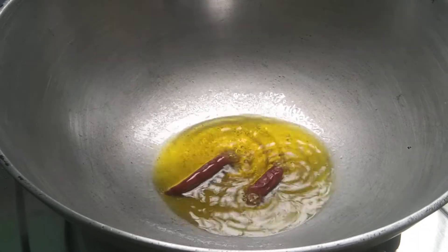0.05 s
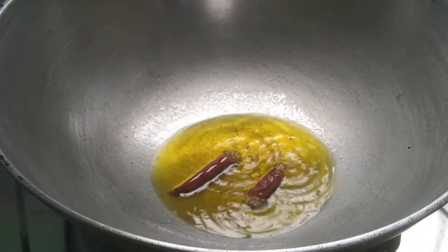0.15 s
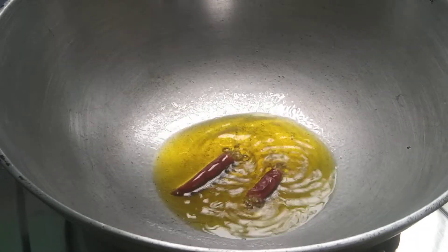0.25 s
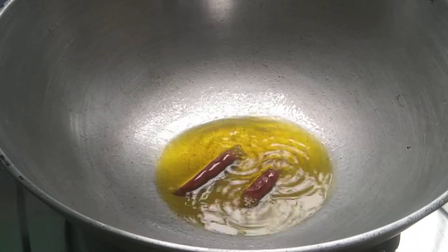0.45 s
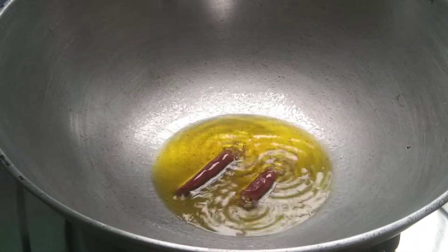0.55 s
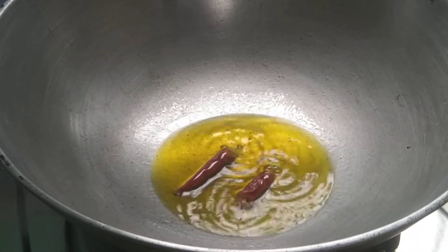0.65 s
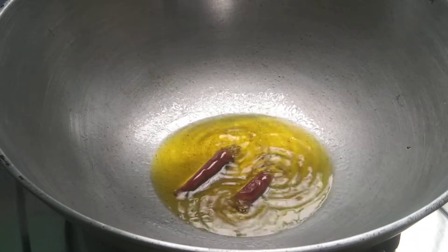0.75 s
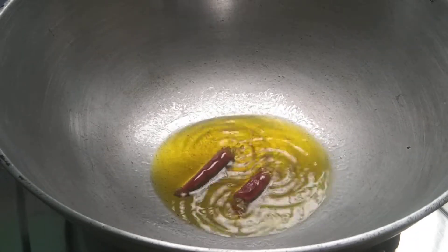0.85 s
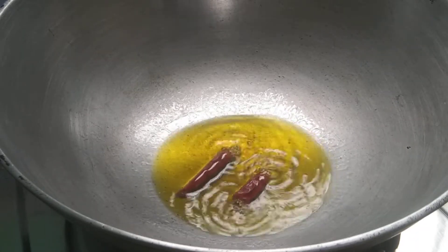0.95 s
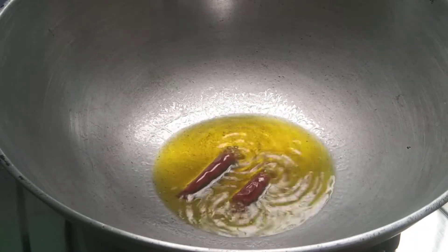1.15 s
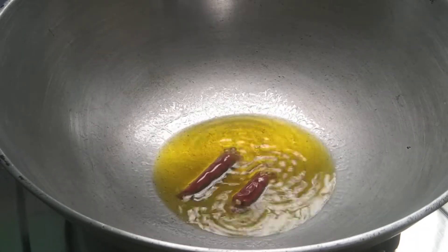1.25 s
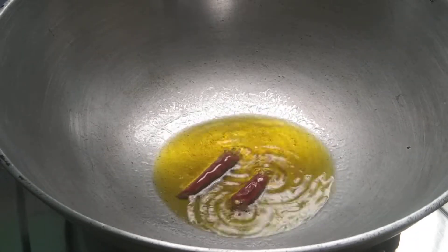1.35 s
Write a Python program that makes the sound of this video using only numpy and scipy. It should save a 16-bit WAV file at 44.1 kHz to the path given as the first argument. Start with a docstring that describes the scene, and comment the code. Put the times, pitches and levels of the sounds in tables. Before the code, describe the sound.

A chattering, ringing metal scrape in a pan, then a sharp oil spit over faint frying fizz

```python
"""A metal spatula is dragged chattering along a metal pan of hot oil in a small kitchen.
The scrape is a stream of tiny random hits, following a pressure curve, that rings the metal's resonances.
The oil spits in short bursts of noise, one big one after the scrape, and gives off faint low rings.
Dense tiny clicks make its steady treble fizz, with a spray that dies away from the start.
A dying noise tail adds the room, and soft coloured noise lies beneath everything."""
import sys
import numpy as np
from scipy import signal
from scipy.fft import rfft, irfft
from scipy.io import wavfile
from scipy.ndimage import uniform_filter1d

SR = 44100
rng = np.random.default_rng(int(sys.argv[2]) if len(sys.argv) > 2 else 0)


def how_loud(loudness_db):
    """Turn decibels into a plain amplitude multiplier (0 dB gives 1, 20 dB gives 10)."""
    steps = np.asarray(loudness_db, float) / 20
    return 10 ** steps


def to_wav(s):
    """Save 16-bit WAV."""
    ch = np.atleast_2d(s).T  # columns
    pcm = np.round(np.clip(ch, -1, 1) * 32767)  # PCM
    wavfile.write(sys.argv[1], SR, pcm.astype(np.int16))


N = 61739  # length of the scene in samples


def evened(x):
    """Scale a sound to an rms (average strength) of 1."""
    return x / np.sqrt(np.mean(x ** 2) + 1e-20)


def read(points, hz):
    """Read a table of (Hz, value) between its points, on a log-frequency axis."""
    f, value = np.transpose(points)
    return np.interp(np.log(hz + 1), np.log(f + 1), value)


def coloured(x, spectrum):
    """Filter a sound by a spectrum in dB, then scale it to an rms of 1."""
    gain = how_loud(read(spectrum, np.fft.rfftfreq(len(x), 1 / SR)))
    return evened(irfft(rfft(x) * gain, len(x)))


def add(mix, s, sound):
    """Mix a sound in, starting at s seconds."""
    part = mix[round(s * SR):][:len(sound)]
    part += sound[:len(part)]


def resonate(x, hz, width):
    """One complex pole: a resonance of gain 1 at hz; the narrower it is, the longer it rings."""
    r = np.exp(-np.pi * width / SR)
    return signal.lfilter([1 - r], [1, -r * np.exp(2j * np.pi * hz / SR)], x)


def clicks(per_s, spread_db):
    """Random tiny impacts, a few large, scaled to an rms of 1."""
    size = how_loud(spread_db * np.minimum(rng.exponential(1, N), 5))
    sign = rng.choice([-1., 1.], N)
    happens = rng.random(N) < per_s / SR
    return evened(size * sign * happens)


def chatter_drive():
    """The blade's tiny hits follow its pressure; the low modes feel only part of the pressure swings."""
    # Pressure along the stroke. Each row: time in seconds, pressure in dB.
    pressure = [(0.223, -52.5), (0.2393, -38.5), (0.238, -27), (.267, -24.5), (0.27, -29), (0.298, -36.5),
                (0.344, -37.5), (0.355, -27.5), (0.379, -25.5), (0.383, -46), (.39, -34), (0.392, -36.5),
                (0.417, -25.5), (.425, -26), (0.461, -27), (0.477, -43), (.488, -24.5), (0.496, -24.5),
                (.512, -23.5), (.535, -29.5), (0.584, -33), (0.5956, -35.5), (0.597, -20), (.615, -27),
                (0.636, -24), (0.643, -44), (0.658, -21.5), (0.694, -31.5), (0.698, -44), (0.718, -51.5)]
    low_follow, low_pivot_db = 0.5, -27  # share of the swings kept, and the pressure they swing around
    judder_db, judder_s = 2.5, 0.006
    s, db = np.transpose(pressure)
    db = np.interp(np.arange(N) / SR, s, db, -150, -150)  # all but silent outside the stroke
    chatter = clicks(6000, 1.5)  # hits per second, spread of their sizes in dB
    judder = evened(uniform_filter1d(rng.standard_normal(N), round(judder_s * SR)))
    drive = how_loud(db) * evened(chatter * how_loud(judder_db * judder))
    low_db = np.where(db > -43, low_pivot_db + low_follow * (db - low_pivot_db), db)
    return drive, how_loud(low_db) * chatter


def rasp(drive):
    """Countless minor modes: the hits filtered by a broad spectrum with small random ups and downs."""
    # Colour of the rasp. Each row: frequency in Hz, relative level in dB per Hz.
    rasp_colour = [(1590, -47), (2700, -26.5), (3350, -7.5), (3750, -7.5), (4250, -3), (4610, 1.5),
                   (6750, -3.5), (8130, 3.5), (9940, -8.5), (11100, -15), (16000, -24)]
    comb_db, comb_hz, level_db = 1.5, 59.8, -5.5  # size and width of the ups and downs; level against drive
    bins = max(round(comb_hz * N / SR), 1)
    comb = evened(uniform_filter1d(rng.standard_normal(N // 2 + 1), bins))
    rough = irfft(rfft(drive) * how_loud(comb_db * comb), N)
    return how_loud(level_db) * coloured(rough, rasp_colour) * np.sqrt(np.mean(drive ** 2))


def spatula():
    """Chatter rings the metal in many modes; the spot touched picks how strongly each one rings."""
    # Ringing modes of the metal. Each row: basic width in Hz, then relative level in dB at each of five spots.
    modes = [(61.3, -75, -63, -63, -73, -65.5), (83.333, -89, -62, -50.5, -33, -56),
             (55.6, -43, -64, -39, -49, -60), (70, -49.5, -50.5, -40, -46.5, -68),
             (47.3, -66, -69, -52.5, -51.5, -42), (60.5, -38.5, -53, -73, -73, -35.5),
             (50, -30, -39, -39, -48, -32), (40, -40.5, -32.5, -23.5, -15, -10),
             (74, -38.5, -54, -31.5, -16, -22), (32.4, -31, -39, -36, -24.5, -22.5),
             (162, -72, -67, -32, -22, -25.5), (43, -31.5, -37, -23, -19, -22.5),
             (65, -22, -49, -14, -15.5, -63), (97, -8, -16.5, -12, -19, -18),
             (60, -22.5, -24, -27.5, -49, -50), (23.1, -16.5, -15, -25, -39, -26.5),
             (15.8, -18.5, -18, -8, -16.5, -3), (39.3, -24, -12.5, -20.5, -41, -32),
             (23.6, -27.5, -17.5, -29, -38, -40), (27, -8, -9, -35, -37, -14),
             (32.3, -9.5, -10, -19.5, -30, -10), (30, -3.5, -24.5, -28.5, -29, -12),
             (30, -13, -27, -33, -45, -21), (19.7, -16, -19, -15, -36, -17), (27, -15, -14, -4, -23, -12.5),
             (36.7, -16, -12.5, -13, -6, -21), (30, -12, -21, -8, -33, -12), (30, -2, -21, -24, -13.5, -10),
             (14, -35, -6, -7.5, -11, 0), (38.8, -38, -26, -11.5, -6.5, -20.5),
             (39, -33, -33.5, -37.5, -29, -44), (25, -31, -16.5, -34, -4, -46),
             (35, -23, -37, -14, -43, -6.5), (60, -16, -17.5, -21.5, -16.5, -27),
             (56.6, -24, -35, -40, -41, -42), (43, -27, -40, -29.5, -25.5, -54),
             (57.7, -39, -38, -28, -27, -35), (41.3, -23, -35, -37, -25, -43),
             (44.9, -58, -46, -32, -29, -45), (39.5, -28, -48, -45, -30, -25),
             (40.5, -46, -50, -34, -43, -35)]
    # Pitch of each of those modes, in Hz.
    mode_hz = [520, 770, 860, 950, 1150, 1500, 1660, 1815, 1930, 2165, 2400, 2850, 3090, 3380, 3600, 3965,
               4506, 4945, 5200, 5635, 6240, 6385, 6559, 6815, 7510, 7615, 8020, 8098, 8284, 8390, 8660,
               8880, 9640, 10000, 10600, 11380, 12100, 12620, 13700, 14380, 15400]
    # Five stretches of the stroke, each touching its own spot: start of each in seconds.
    spot_start = [.22, .345, .415, .54, .65]
    low_hz, touch_damping = 2300, 1.8  # modes above low_hz are widened this many times
    skirt, twin_apart, twin_db = 5.0, 1.5, -6.0  # skirt and twin distance are in mode widths
    wander_db, wander_s, spot_blend_s = 2.0, 0.03, 0.023
    drive, low_drive = chatter_drive()
    out = rasp(drive)
    # Each mode's level wanders, one value per 64 samples.
    wander = rng.standard_normal((len(modes), N // 64 + 2))
    wander = evened(uniform_filter1d(wander, max(round(wander_s * SR / 64), 1), axis=1))
    spot = np.clip(np.searchsorted(spot_start, np.arange(N) / SR) - 1, 0, None)
    sides = rng.uniform(-1, 1, len(modes))
    for hz, (width, *spot_db), drift, side in zip(mode_hz, modes, wander, sides):
        high = hz > low_hz
        width = width * (touch_damping if high else 1)  # the pressed blade rings shorter
        level_db = uniform_filter1d(np.array(spot_db, float)[spot], round(spot_blend_s * SR))
        level_db = level_db + wander_db * np.repeat(drift, 64)[:N]
        near = how_loud(level_db) * (drive if high else low_drive)
        for stage in range(3):  # wide resonances first, to keep the hits near the mode's pitch
            near = resonate(near, hz, skirt * width)
        twin_hz = hz + twin_apart * width * (side + np.sign(side))
        ring = resonate(near, hz, width) + how_loud(twin_db) * resonate(near, twin_hz, width)
        out += np.sqrt(4 * SR / np.pi / width) * ring.real  # narrow modes pass less noise, so lift them
    return out


def spits():
    """Each spit is a short dying burst of noise round one pitch, with no lows."""
    # Spits of the oil. Each row: start in seconds, peak level in dB before the low cut, pitch in Hz,
    # half the width of each resonance in Hz, time in seconds for the noise to fall to 37 percent.
    spit_table = [(.0575, -24.5, 9800, 4100, 0.00036), (0.061, -41, 11000, 3060, 0.00047),
                  (0.074, -45, 11300, 3220, 0.0004), (.0957, -41, 11100, 3240, .0003),
                  (0.103, -32.5, 9600, 1500, 0.00033), (0.9966, -23, 8610, 1430, 0.0045),
                  (1, -36.5, 5810, 1170, 0.028), (1.0017, -16, 8260, 950, 0.0018),
                  (1.1513, -35.5, 7600, 2000, 0.0004), (1.192, -39, 6200, 1480, 0.0012),
                  (1.213, -55, 12200, 3060, 0.00094), (1.132, -61, 8600, 2050, 0.00069),
                  (1.305, -48.5, 5500, 394, 0.0061)]
    out, t = np.zeros(N), np.arange(SR // 8) / SR
    for s, db, hz, half_width, length in spit_table:
        burst = rng.standard_normal(len(t)) * np.exp(-t / length)
        for stage in range(4):
            burst = resonate(burst, hz, 2 * half_width)
        add(out, s, how_loud(db) * burst.real / abs(burst).max())
    low_cut = signal.butter(6, 3800, "high", fs=SR, output="sos")  # Hz
    return signal.sosfilt(low_cut, out)


def blips():
    """Faint rings: short, soft-started, dying tones whose level throbs like a beating pair."""
    # Faint low rings. Each row: start in seconds, level in dB before the throb and soft start,
    # pitch in Hz, time in seconds to die by 60 dB.
    blip_table = [(.05, -67, 2220, .07), (.999, -58, 2780, .12), (1.073, -62, 2370, .05),
                  (1.08, -64, 2800, .1), (1.33, -61, 2170, .05), (1.33, -64, 1720, .05),
                  (.828, -69, 740, .2)]
    beat_hz, beat_depth, rise_s = 55.5, 0.54, 0.0054  # each ring varies the beat speed by its own pace
    out, t = np.zeros(N), np.arange(SR // 4) / SR
    for (s, db, hz, t60), pace in zip(blip_table, rng.uniform(0.57, 1.5, len(blip_table))):
        beat = 1 + beat_depth * np.sin(2 * np.pi * beat_hz * pace * t)
        fade = how_loud(db - 60 * t / t60) * np.minimum(t / rise_s, 1)
        add(out, s, fade * beat * np.sin(2 * np.pi * hz * t))
    return out


def fizz():
    """Dense tiny bubbles click in the treble, plus a spray of clicks that dies away from the start."""
    # Colour of the bubbles. Each row: frequency in Hz, relative level in dB.
    fizz_colour = [(2500, -45), (3800, -33), (4150, -14), (4600, -4), (5150, -9), (5600, -1), (7400, 0),
                   (8100, 2), (9200, -3), (11000, -12), (12500, -25), (16000, -33)]
    # Loudness of the bubbles, room included. Each row: time in seconds, rms level in dB.
    fizz_level = [(0, -57), (.22, -55.5), (.95, -58), (1.02, -56), (1.1, -55), (1.249, -55.5), (1.4, -56)]
    # Colour of the spray. Each row: frequency in Hz, relative level in dB per Hz.
    spray_colour = [(1470, -59), (2500, -26.5), (3060, -31), (3630, -19), (3920, -21.5), (4270, -16),
                    (5110, -15), (7890, -1.5), (10200, -14), (16000, -39)]
    per_s, spread_db = 6100, 3.0  # clicks per second, spread of their sizes in dB
    spray_db, spray_t60 = -41.5, 0.52  # rms level at the start, seconds to die by 60 dB
    t, (s, db) = np.arange(N) / SR, np.transpose(fizz_level)
    grains = coloured(clicks(per_s, spread_db), fizz_colour)
    spray = coloured(clicks(per_s, spread_db), spray_colour)
    steady = how_loud(np.interp(t, s, db)) * evened(grains + kitchen(grains))
    dying = how_loud(spray_db - 60 * t / spray_t60) * evened(spray + kitchen(spray))
    return steady + dying


def kitchen(x):
    """Room echo: the sound smeared by a noise tail of energy 1, each band dying at its own speed."""
    # How long the room rings. Each row: frequency in Hz, time in seconds to die by 60 dB.
    room_t60 = [(700, 0.39), (2000, 0.4), (5000, 0.57), (9000, 0.46), (15000, 0.37)]
    hz, t, z = signal.stft(rng.standard_normal(SR), SR, nperseg=256)
    fade = how_loud(-60 * t / read(room_t60, hz)[:, None])
    tail = signal.istft(z * fade, SR, nperseg=256)[1]
    return signal.fftconvolve(x, tail / np.linalg.norm(tail))[:N]


def room_tone():
    """The soft background: steady random noise, filtered to one colour."""
    # Colour of the background. Each row: frequency in Hz, relative level in dB per Hz.
    hush_colour = [(15, -35), (25, -15), (65, 6), (219, -2), (243, 2.5), (416, -2), (579, -3), (2000, -6.5),
                   (2180, -12.5), (3030, -14), (3500, -24), (4550, -15), (7700, -120)]
    return how_loud(-77.5) * coloured(rng.standard_normal(N), hush_colour)  # rms level in dB


def scene():
    """Add up the scrape, the oil, their room echo, the fizz and the room tone."""
    metal = spatula()
    oil = spits() + blips()
    echo = kitchen(how_loud(-7.5) * metal + how_loud(-3) * oil)  # share of each sent to the room, in dB
    return (metal + oil + echo + fizz() + room_tone())[None]


def top_cut(x):
    """Nothing passes above the cut-off."""
    return signal.sosfilt(signal.butter(12, 16160, fs=SR, output="sos"), x)


def record(dry):
    """Pass the finished mix on through the recorder's cut-off at the top of the treble, with its level left
    alone."""
    return top_cut(dry)


dry = scene()
out = record(dry)
to_wav(out)
```